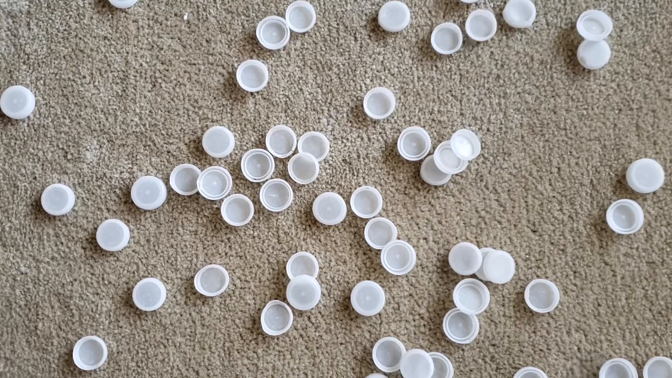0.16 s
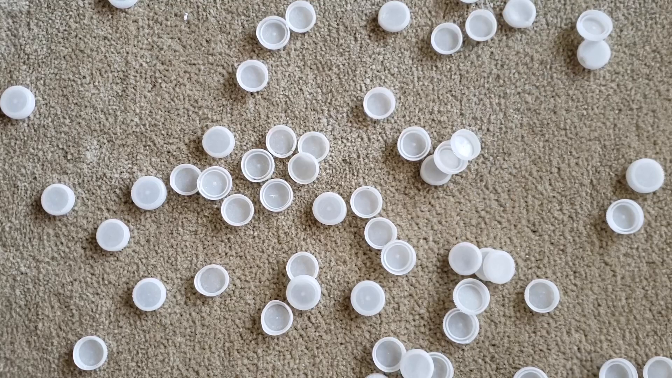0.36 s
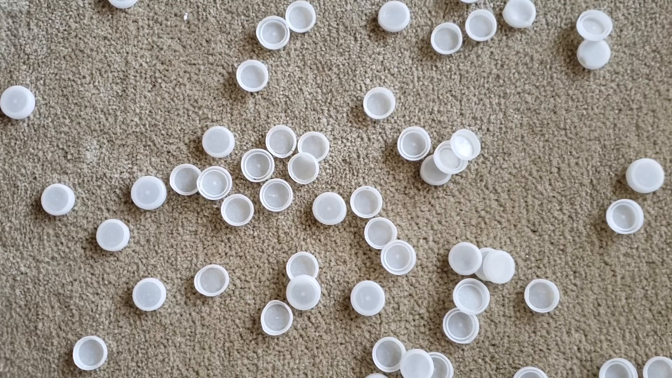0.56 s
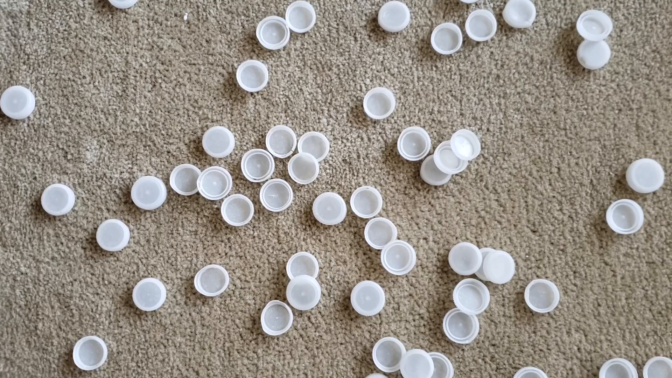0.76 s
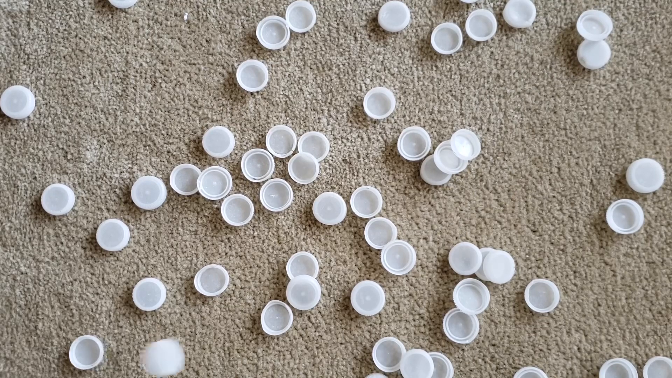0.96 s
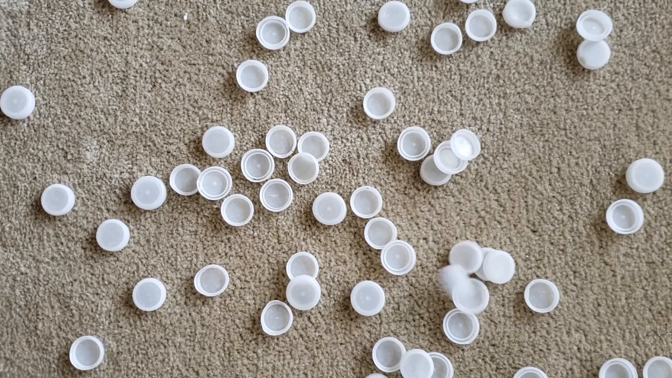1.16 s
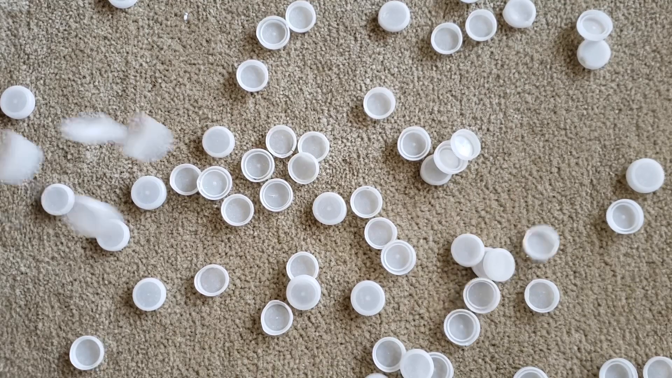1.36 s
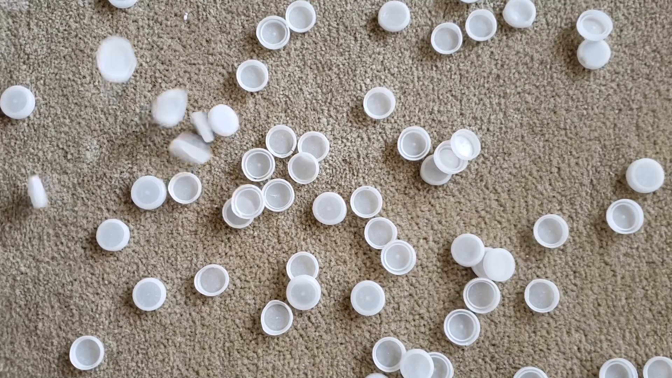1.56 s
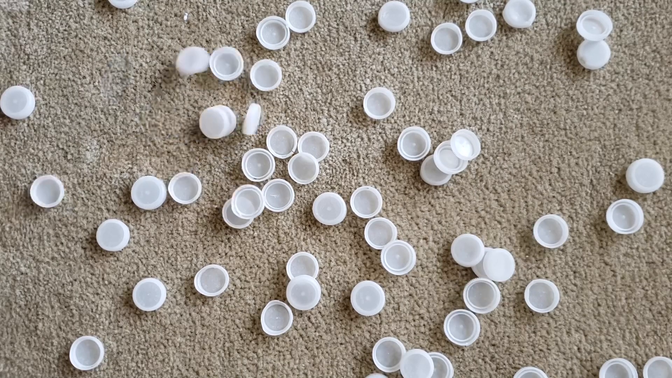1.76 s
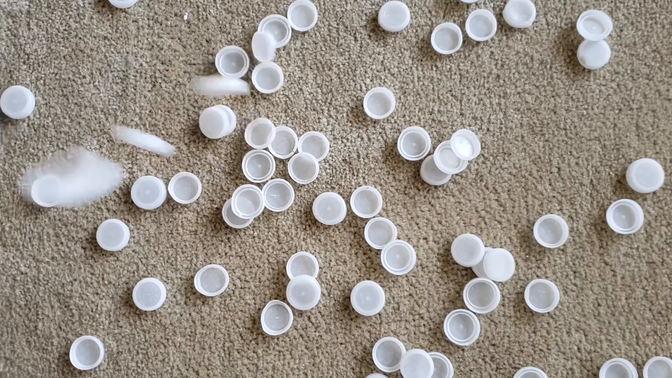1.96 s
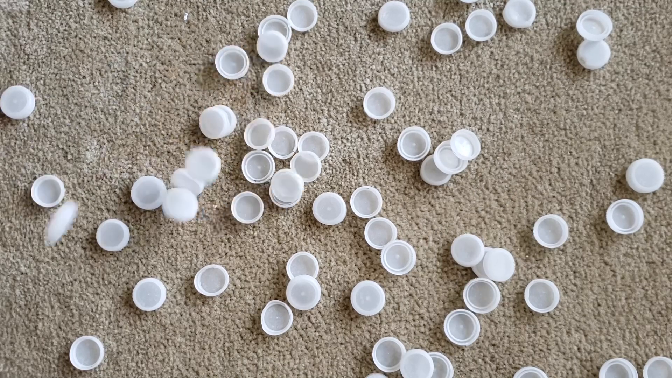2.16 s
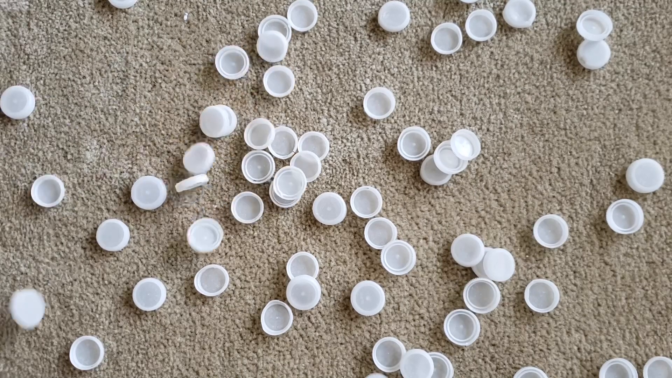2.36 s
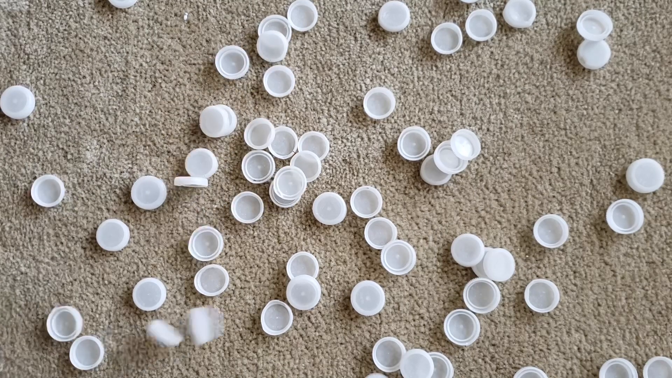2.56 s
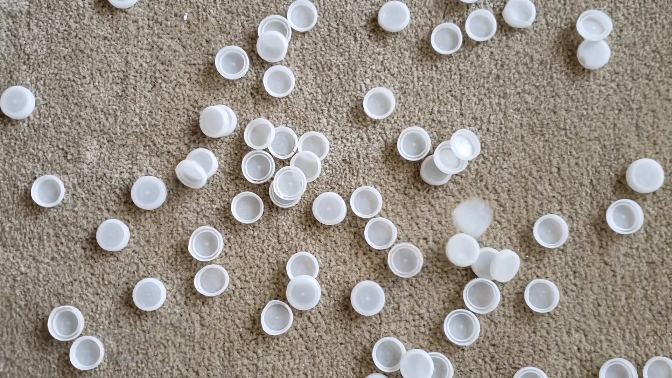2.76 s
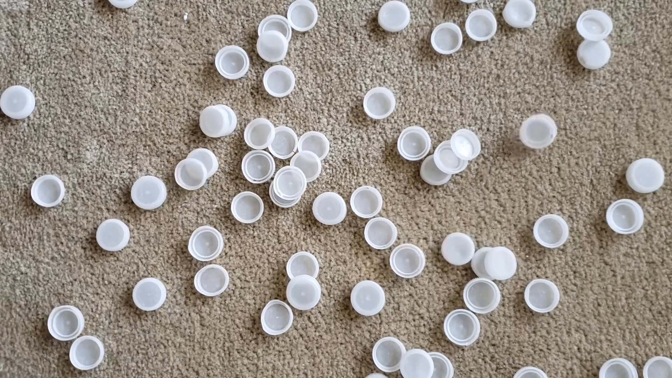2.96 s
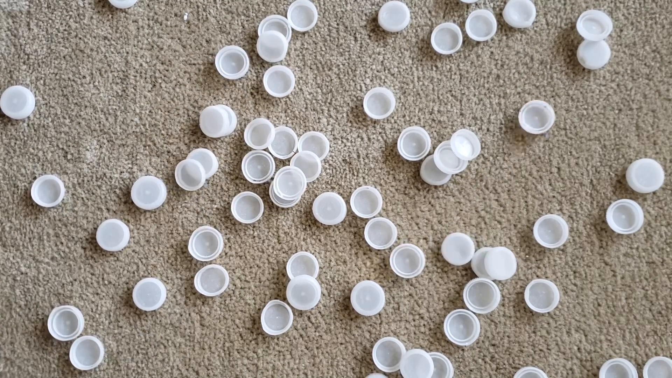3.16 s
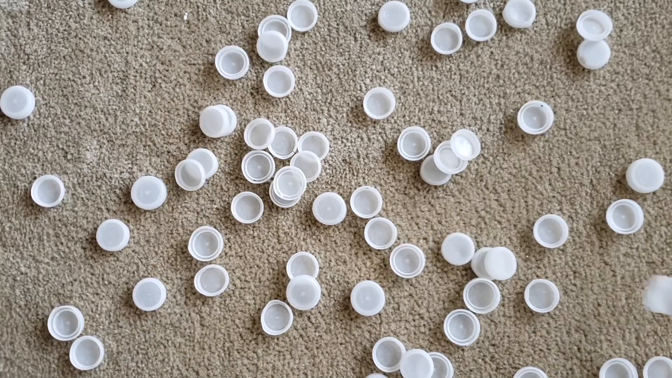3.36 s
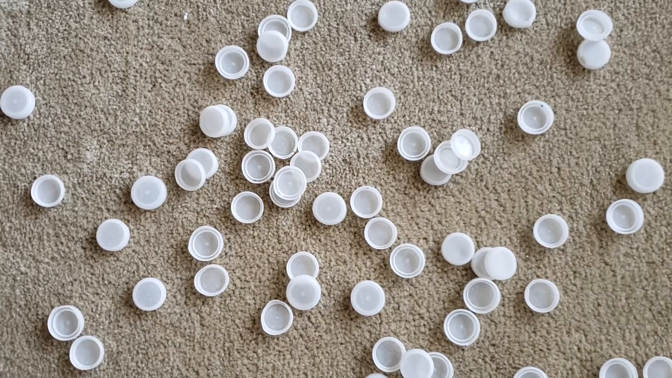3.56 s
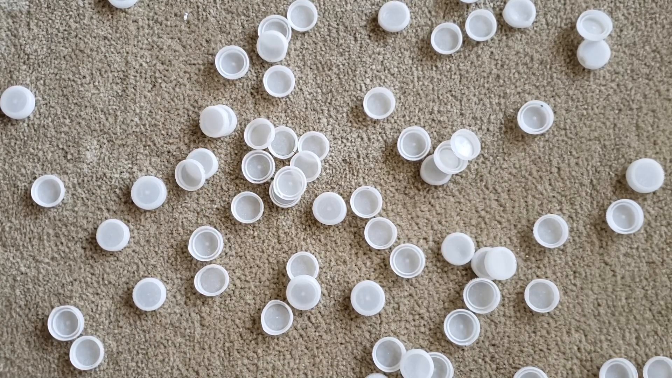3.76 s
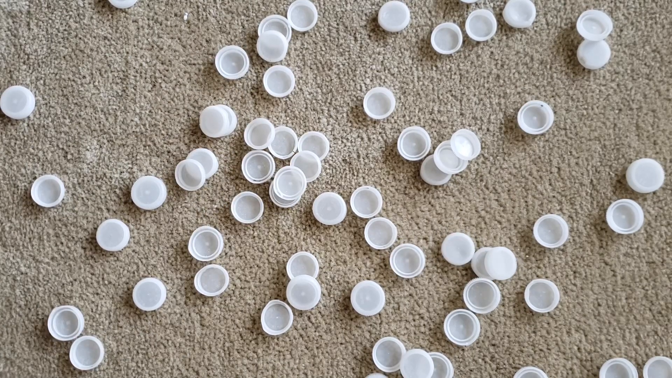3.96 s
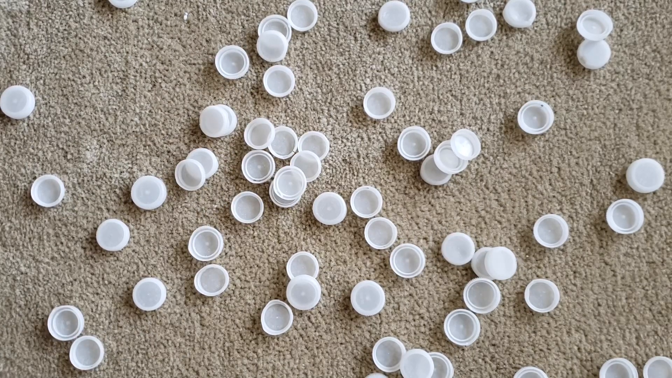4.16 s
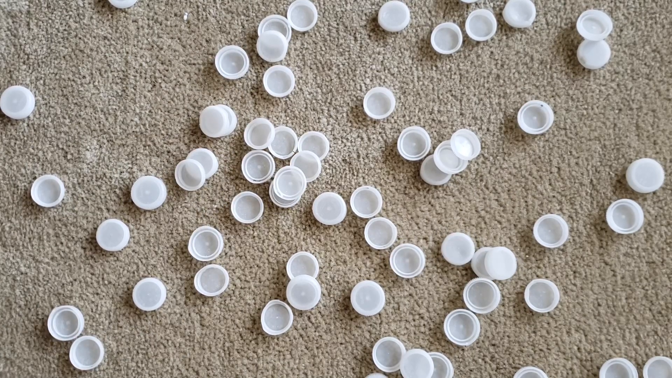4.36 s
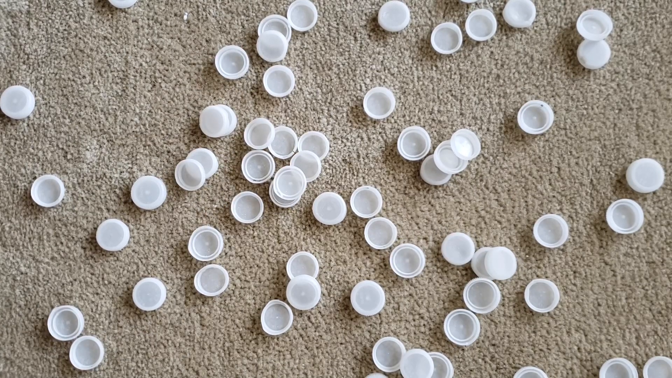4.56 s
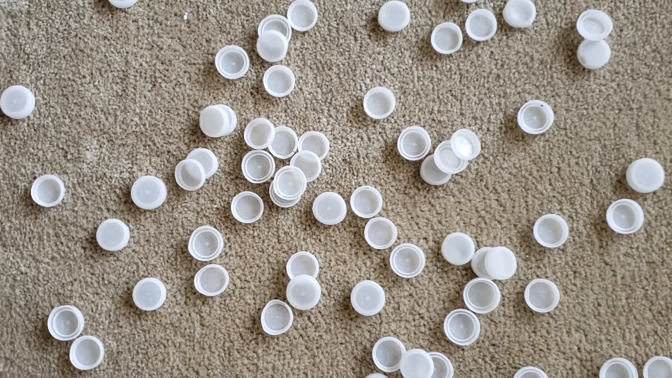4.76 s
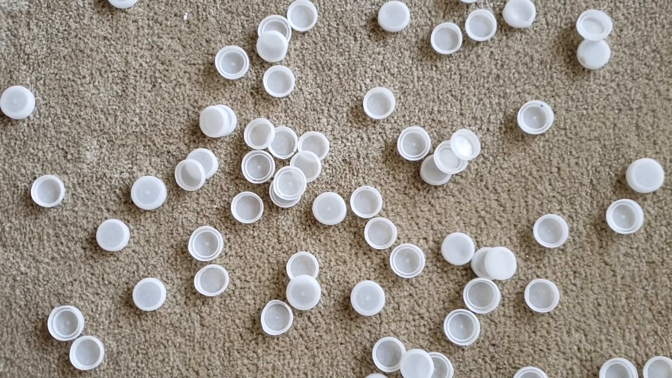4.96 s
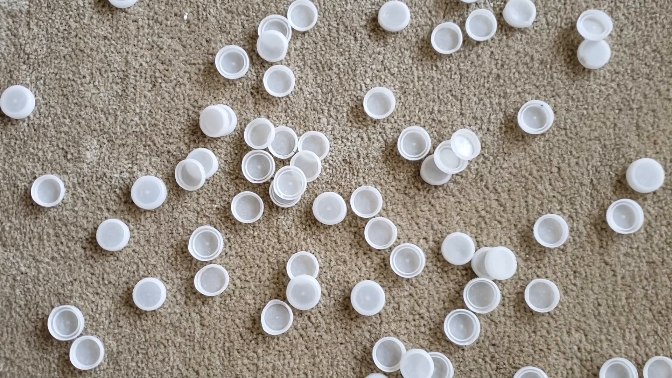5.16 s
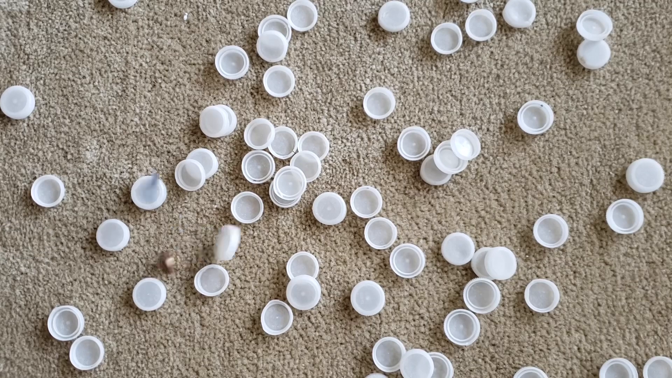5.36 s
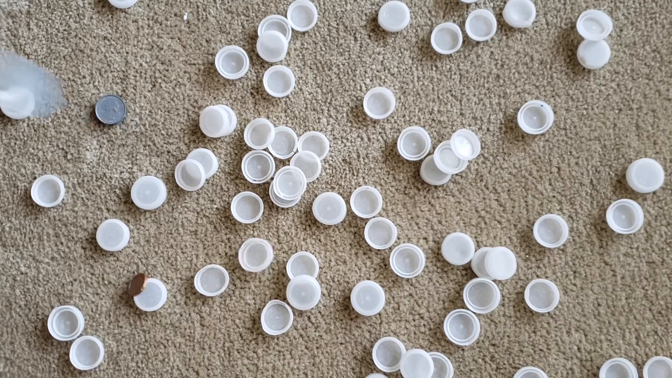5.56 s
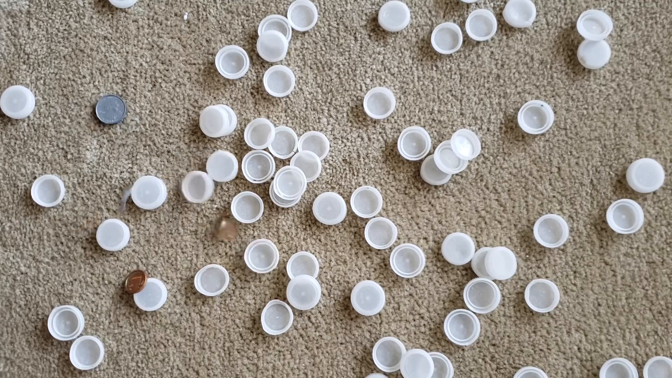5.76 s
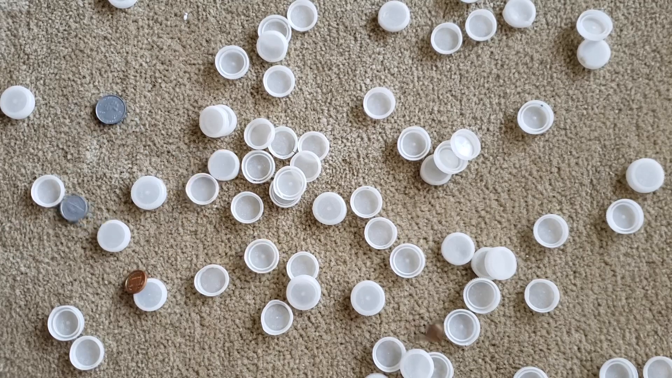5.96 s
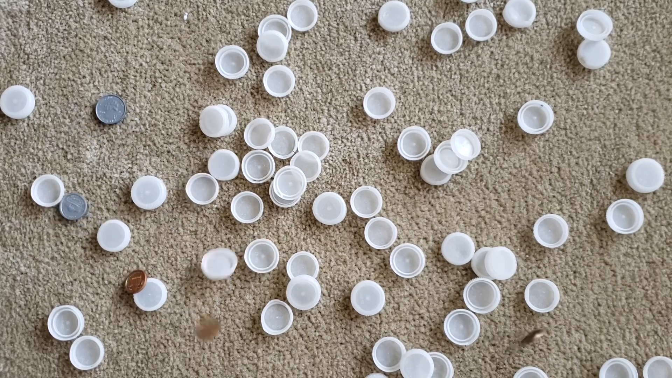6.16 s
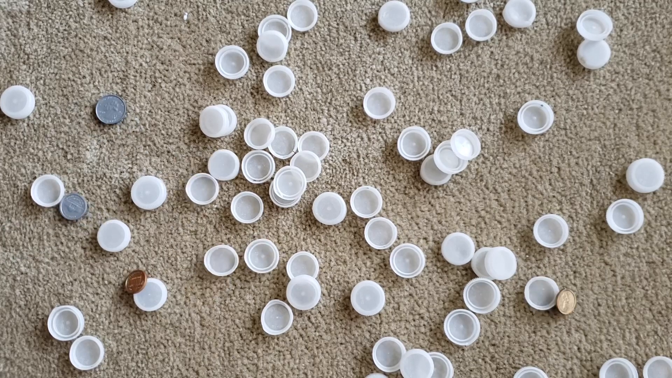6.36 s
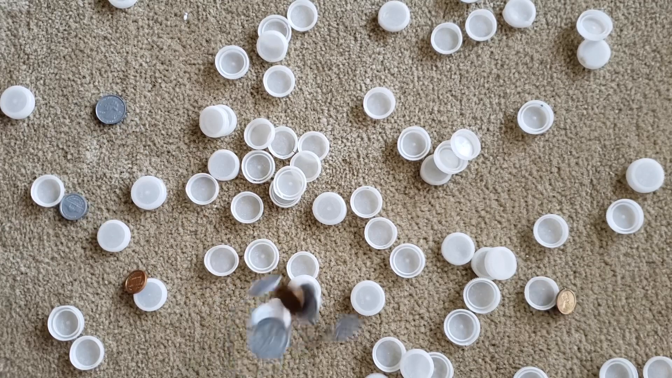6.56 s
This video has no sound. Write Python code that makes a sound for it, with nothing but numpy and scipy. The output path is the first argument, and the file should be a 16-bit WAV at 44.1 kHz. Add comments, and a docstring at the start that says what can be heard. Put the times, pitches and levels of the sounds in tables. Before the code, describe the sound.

Plastic bottle caps clatter in bright hollow clicks onto others on carpet, a distant engine swells faintly, then coins jingle and clink onto the caps.

```python
"""A small live room with a carpet, heard at two microphones over rumble, hum (one sine) and hiss (shaped noise).
From the start until 2.9 s plastic bottle caps are tossed onto caps on the carpet: damped modes and contact
noise, with soft thuds and ticks; a hand's noisy brush comes before the last toss. Around 4 s a distant
engine, a stack of sines, swells for a second. From 4.9 s coins are shuffled in a palm as a spray of ticks,
clink as they leave the hand and land on the caps, each coin ringing in one mode."""
import sys
import numpy as np
from scipy import signal
from scipy.fft import rfft, irfft, next_fast_len
from scipy.io import wavfile

SR = 44100
rng = np.random.default_rng(int(sys.argv[2]) if len(sys.argv) > 2 else 0)


def waveform_to_disk(signal):
    """Save audio, clipped to [-1, 1], as 16-bit WAV at the path in sys.argv[1]."""
    frames = np.transpose(np.atleast_2d(signal))
    scaled = np.clip(frames, -1, 1) * 32767
    samples = np.round(scaled).astype(np.int16)
    wavfile.write(sys.argv[1], SR, samples)


N = 291060

# Throughout these tables f/Hz with a relative level/dB is a spectrum: only its shape counts.
# rumble of the room over time: t/s, level/dB
RUMBLE_LEVEL = [(0, -66), (1.3, -61.5), (2.3, -58.5), (3.1, -63), (4.4, -59), (5.6, -58.5), (6.6, -59)]
# spectrum of the rumble: f/Hz, relative level/dB
RUMBLE_SPECTRUM = [(20, -40), (30, -26.5), (45, 4.5), (62, 4), (110, -1.5), (160, -10), (280, -15.5),
                   (400, -24), (650, -40), (1000, -37), (2200, -86)]
# spectrum of the microphone hiss: f/Hz, relative level/dB
HISS_SPECTRUM = [(240, -21), (450, -10.5), (800, -12.5), (1750, -17.5), (4000, -22), (7900, -35),
                 (10700, -23.5), (15300, -20), (16500, -33)]
# likeness of left and right in the steady noises: f/Hz, correlation (below 0 counts as 0)
STEREO_LIKENESS = [(60, 0.81), (180, 0.81), (550, -1.1), (1650, -1.7), (4970, 0.93), (15000, -1)]
# partials of the engine: multiple of the firing rate, relative level/dB
ENGINE_PARTIALS = [(2, 1), (3, -4), (4, -14), (5, -14), (6, -20.5), (7, -19.5), (8, -23.5), (9.5, -24)]
# the distant engine's swell
ENGINE_S, ENGINE_RISE_S, ENGINE_HOLD_S, ENGINE_FALL_S, ENGINE_DB = 4.03, 0.5, 0.72, 0.6, -51.5
ENGINE_HZ, ENGINE_HZ_PER_S = 29.8, 0.6  # firing rate on reaching full level, and its slow climb
SWELL_DB = 30  # climb of any swell over its rise, and drop over its fall

# spectrum of the hand's brush: f/Hz, relative level/dB
SCUFF_SPECTRUM = [(200, 8.5), (700, -4), (1400, 1.5), (2500, -16), (7000, -26), (10500, -1.5), (15000, -23)]
SCUFF_S, SCUFF_RISE_S, SCUFF_HOLD_S, SCUFF_FALL_S, SCUFF_DB = 2.58, 0.12, 0.058, 0.089, -66

# the pitch at which each size of coin rings
SMALL_HZ, MEDIUM_HZ, WIDE_HZ, LARGE_HZ = 12640, 8130, 7300, 5350
# shuffles of coins in the palm: t/s at full strength, rise/s, hold/s, level/dB of the ticks
PALM_SHUFFLES = [(4.903, 0.055, 0.018, -76), (5.202, 0.17, .07, -63), (5.603, 0.037, 0.01, -48.5),
                 (6.094, 0.082, 0.033, -49.5), (6.239, 0.31, 0.024, -50.5)]
SHUFFLE_RELEASE_S = 0.037  # the shuffle stops as the coins leave
# spectrum of coin sliding on or touching coin: f/Hz, relative level/dB
COIN_CONTACT_SPECTRUM = [(880, -46), (1500, -20), (2040, -39.5), (2540, -17.5), (3310, -14), (6120, -8),
                         (6830, -18.5), (8400, -2.5), (11100, 1), (16000, -13)]
# ring over ticks; medium coin against small; decay time, damped by the hand
JINGLE_DB, JINGLE_MEDIUM_DB, JINGLE_T60 = -8, -9, 0.011
# coin on coin leaving the hand: t/s, ring level/dB, coin pitch f/Hz
COIN_CLINKS = [(4.901, -66, SMALL_HZ), (5.122, -63.5, SMALL_HZ), (5.186, -52.5, SMALL_HZ),
               (5.2423, -44.5, SMALL_HZ), (5.2603, -41, MEDIUM_HZ), (5.6013, -40.5, MEDIUM_HZ),
               (5.6353, -35, SMALL_HZ), (6.0854, -40, MEDIUM_HZ), (6.1112, -46, SMALL_HZ),
               (6.1497, -35.5, SMALL_HZ), (6.4616, -37, SMALL_HZ), (6.4923, -52, MEDIUM_HZ)]
CLINK_TICK_DB, HAND_PAN_DB = -5.5, -3.5  # contact tick over the ring; the hand's place, left over right

# spans of soft cap ticks, in the hand or after a toss: start t/s, end t/s, typical body level/dB,
# typical cap pitch f/Hz
CAP_NUDGES = [(0.599, 0.67, -73, 3400), (0.847, 1.08, -62, 3750), (1.19, 1.4, -46.5, 3300),
              (1.571, 1.69, -52, 3200), (1.738, 1.8, -53.5, 3480), (1.879, 1.96, -53, 3300),
              (2.798, 2.843, -58, 3700)]
# contacts a second; their scatter (its sign is immaterial); snap over body
NUDGE_PER_S, NUDGE_SPREAD_DB, NUDGE_SNAP_DB = 40, -1, -13
CAP_SPREAD = 0.095  # relative scatter of the nudging caps' pitch
CAP_ROOM_DB, CAP_PAN_DB = -2.5, -2  # room setting of a cap; mean place of the small contacts, left over right

# a coin lands on a cap, or its strong near reflection (6.5333): t/s, nominal body level/dB,
# cap pitch f/Hz, nominal snap level/dB, left over right/dB, coin pitch f/Hz, ring level/dB
COIN_LANDINGS = [(5.2922, -31, 3395, -22.5, -29, SMALL_HZ, -42),
                 (5.2984, -30.5, 3290, -25.5, 15, WIDE_HZ, -27.5),
                 (5.3103, -26, 3340, -22, -4.5, SMALL_HZ, -21.5),
                 (5.3224, -28.5, 3376, -42, -25, SMALL_HZ, -30),
                 (5.4226, -41, 3040, -41.5, -10, SMALL_HZ, -40),
                 (5.6506, -23.5, 4052, -28, -8, MEDIUM_HZ, -37), (5.721, -56, 4150, -65, 2, SMALL_HZ, -48),
                 (5.8063, -42.5, 3385, -46, -13, MEDIUM_HZ, -43),
                 (5.817, -42.5, 3370, -39.5, -5, MEDIUM_HZ, -39),
                 (5.9738, -55.5, 3530, -47.5, -13, SMALL_HZ, -53),
                 (6.126, -45, 4000, -32.5, -2, SMALL_HZ, -47), (6.2358, -40, 4320, -37, -8, MEDIUM_HZ, -47),
                 (6.2523, -43.5, 4160, -48, -17, MEDIUM_HZ, -44),
                 (6.3577, -29.5, 3280, -27.5, -44, SMALL_HZ, -28.5),
                 (6.3636, -39, 3230, -35.5, 40, SMALL_HZ, -32.5),
                 (6.531, -20, 4630, -33.5, -17, LARGE_HZ, -20),
                 (6.5333, -27.5, 3860, -35, 0, LARGE_HZ, -29),
                 (6.5719, -30, 3310, -30, -7, LARGE_HZ, -23.5),
                 (6.5778, -24.5, 3390, -43, -2, SMALL_HZ, -50)]
COIN_ROOM_DB, COIN_T60 = 0.5, 0.026  # room setting of a coin; how long a coin rings (s)

# clear blows of cap on cap: t/s, nominal body level/dB, cap pitch f/Hz, nominal snap level/dB,
# left over right/dB
CAP_BLOWS = [(-0.03, -40.5, 4550, -45.5, -4), (0.852, -50.5, 3630, -65.5, -7),
             (0.938, -57.5, 3750, -67, -23), (1.048, -57.5, 3870, -71, -17), (1.1675, -30, 3590, -36, -28),
             (1.1715, -36.5, 3420, -48, 0), (1.1899, -42.5, 3620, -42, -4), (1.2898, -39, 3655, -50, -15.5),
             (1.3548, -35, 3370, -48.5, -8), (1.371, -43.5, 3120, -52, 3.5),
             (1.4207, -19.5, 3390, -27, -11.5), (1.4239, -22, 4117, -25.5, -7.5),
             (1.5231, -45.5, 3210, -49, -5), (1.5387, -48, 3170, -51.5, -8), (1.6291, -40, 3504, -56.5, -4),
             (1.6598, -39.5, 3066, -51, -4), (1.673, -42.5, 3380, -50.5, -5),
             (1.863, -38.5, 3520, -46, -7.5), (1.9176, -38.5, 3360, -57, -13.5),
             (2.009, -39, 3140, -49.5, -10), (2.021, -26, 3080, -24, -10.5),
             (2.068, -32.5, 3320, -43, -10.5), (2.077, -34.5, 4160, -43.5, -6),
             (2.1123, -25.5, 4790, -30.5, -13.5), (2.1148, -21.5, 5640, -35, -5.5),
             (2.258, -36, 4204, -38.5, -4.5), (2.702, -37.5, 3570, -40, -6), (2.7226, -31, 3794, -31.5, -8),
             (2.8097, -50, 4110, -54, -14)]
# soft landings in the pile: t/s, level/dB before the envelope
PILE_THUDS = [(0.0, -50.5), (0.195, -57), (0.932, -58.5), (1.424, -52), (2.012, -52), (2.112, -48.5),
              (2.258, -69), (6.14, -62.5)]
# spectrum of the dull push into the carpet: f/Hz, relative level/dB
CARPET_SPECTRUM = [(25, -40.5), (50, -12), (80, -6), (150, 2.5), (300, -12.5), (700, -20), (2000, -42.5),
                   (6000, -79)]
# modes of a cap's skirt, main one first: multiple of the pitch, relative level/dB, t60/s
# (multiples and levels are typical; a pure blow raises and lengthens the main mode)
SKIRT_MODES = [(1, -0.5, 0.013), (0.76, -21.5, 0.067), (0.91, -12.5, 0.032), (1.12, -8, 0.028),
               (1.74, -19.5, 0.061)]
# modes of a cap's stiff top: typical f/Hz, relative level/dB, t60/s
TOP_MODES = [(10650, 1, 0.056), (10700, 0, 0.012), (11900, -10.5, 0.033)]
# spectrum of the skirt's contact noise: multiple of the cap's pitch, relative level/dB
SKIRT_KNOCK = [(0.15, -42.5), (0.399, -19), (0.7, -2), (1.1, -2), (1.6, -5.5), (2, -15), (3.2, -47.5)]
# spectrum of the top's contact noise: f/Hz, relative level/dB
TOP_SNAP = [(3500, -42), (6300, -8), (7800, -14), (10000, 0), (12500, -3), (15500, -4), (17000, -9.5)]
# spectrum of the hollow tock of the air under a cap: f/Hz, relative level/dB
HOLLOW_TOCK = [(150, -31.5), (450, -18.5), (750, -8.5), (1150, -1.5), (1800, 1), (3500, -25)]

BODY_T60, TREBLE_T60 = 0.43, 0.31  # the room's decay (s) for the caps' body and for the treble
TOP_HZ = 16100  # middle of the recorder's upper band edge


def amp(db):
    """Decibels to gain."""
    return 10 ** (np.asarray(db) / 20)


def unit(x):
    """Scaled to rms 1."""
    return x / np.sqrt(np.mean(x ** 2) + 1e-20)


def attack_unit(x, size=280):
    """Scaled to rms 1 over its first six milliseconds."""
    return x / np.sqrt(np.mean(x[..., :size] ** 2) + 1e-20)


def along(points, hz):
    """(Hz, value) points read on a log frequency axis."""
    f, v = np.transpose(points)
    return np.interp(np.log(hz + 1), np.log(f + 1), v)


def curve(rows):
    """(s, value) rows, one value per sample."""
    return np.interp(np.arange(N) / SR, *np.transpose(rows))


def coloured(x, spectrum):
    """x through a (Hz, dB) spectrum, without phase shift."""
    n = x.shape[-1]
    m = next_fast_len(n)
    gain = amp(along(spectrum, np.fft.rfftfreq(m, 1 / SR)))
    return irfft(rfft(x, m) * gain, m)[..., :n]


def fade(t60, size):
    """An exponential decay by 60 dB in t60 seconds."""
    return np.exp(-np.log(1000) * np.arange(size) / SR / t60)


def swell(s, rise, hold, fall):
    """A gain that climbs by SWELL_DB over the rise, holds from time s, and drops as far over the fall."""
    t = np.arange(N) / SR - s
    distance = np.maximum(-t / rise, (t - hold) / fall)
    return amp(-SWELL_DB * np.clip(distance, 0, 10))


def add(track, s, sound):
    """Mix a sound into the track at time s, cut at the track's ends."""
    start = round(s * SR)
    part = sound[:, max(-start, 0):max(N - start, 0)]
    track[:, max(start, 0):][:, :part.shape[1]] += part


def ring(modes, size=4096):
    """Damped modes, excited a little differently by every blow."""
    t = np.arange(size) / SR
    ringing = np.zeros(size)
    for hz, db, t60 in modes:
        strength = amp(db + 1.0 * rng.normal())
        ringing += strength * fade(t60, size) * np.sin(2 * np.pi * hz * t)
    return attack_unit(ringing * (1 - fade(0.0015, size)))  # soft onset


def crack(spectrum, t60, size=4096):
    """A contact: one sharp impulse and a short noisy chatter."""
    chatter = rng.standard_normal(size) * fade(t60, size)
    impulse = np.arange(size) == 0
    force = chatter / np.linalg.norm(chatter) + 0.7 * impulse
    # start 12 samples late: the colouring also spreads backwards in time
    return attack_unit(coloured(np.roll(force, 12), spectrum))


def room(t60, size=20000):
    """A stereo tail of mean energy 1 a side: single reflections at first, then a dense wash."""
    density = np.clip(0.03 + (np.arange(size) / SR / 0.1) ** 2, 0, 1)
    present = rng.random((2, size)) < density
    arrivals = present * rng.choice([-1, 1], (2, size)) / np.sqrt(density)
    tail = arrivals * fade(t60, size) * (1 - fade(0.03, size)) ** 2
    return unit(tail) / np.sqrt(size)


def placed(sound, pan_db, room_db, t60, echo_db):
    """A sound at the two microphones: direct path, one near reflection and the room."""
    room_sides = unit(amp(np.array([[-1], [1]]) * 3.4))  # the room answers louder on the right
    paths = room(t60) * amp(room_db) * room_sides
    sides = unit(amp(np.array([pan_db, -pan_db]) / 2))
    lag = rng.integers(3, 6)  # samples by which the right microphone hears it later
    echo = round(rng.uniform(0.0019, 0.0029) * SR)
    for side, delay in enumerate((0, lag)):
        paths[side, delay] += sides[side]
        paths[side, echo + delay] += sides[side] * amp(echo_db)
    return signal.fftconvolve(sound[None], paths, axes=1)


def air(spectrum):
    """Steady stereo noise of rms 1; a mid and side mix sets how alike the two microphones hear it."""
    m = next_fast_len(N)
    likeness = np.clip(along(STEREO_LIKENESS, np.fft.rfftfreq(m, 1 / SR)), 0, 1)
    turn = np.arccos(likeness) / 2
    noise = rfft(rng.standard_normal((2, m)))
    mid, side = irfft(noise * [np.cos(turn), np.sin(turn)], m)[:, :N]
    return unit(coloured(np.array([mid + side, mid - side]), spectrum))


def distant_engine():
    """A far engine: sines at multiples of a slowly climbing firing rate swell and sink."""
    t = np.arange(N) / SR
    turns = np.cumsum(ENGINE_HZ + ENGINE_HZ_PER_S * (t - ENGINE_S)) / SR
    engine = np.zeros(N)
    for k, db in ENGINE_PARTIALS:
        engine += amp(db) * np.sin(2 * np.pi * (k * turns + rng.random()))
    passing = amp(ENGINE_DB) * swell(ENGINE_S, ENGINE_RISE_S, ENGINE_HOLD_S, ENGINE_FALL_S)
    return passing * unit(engine)


def background():
    """Room rumble and microphone hiss as shaped noise, mains hum as one sine, and the distant engine."""
    engine = distant_engine()
    rumble = amp(curve(RUMBLE_LEVEL)) * air(RUMBLE_SPECTRUM)
    hiss = amp(-78.5) * air(HISS_SPECTRUM)
    hum = amp(-68) * np.sin(2 * np.pi * 120 * np.arange(N) / SR)
    return rumble + hiss + hum + engine


def scuff():
    """A hand brushes softly past before the last toss of caps: a short swell of shaped noise."""
    brush = swell(SCUFF_S, SCUFF_RISE_S, SCUFF_HOLD_S, SCUFF_FALL_S)
    return amp(SCUFF_DB) * brush * air(SCUFF_SPECTRUM)


def palm():
    """Coins slide over each other in the hand: tiny ticks of very uneven size set them ringing."""
    present = rng.random(N) < 260 / SR  # 260 ticks a second on average
    ticks = present * rng.standard_normal(N) * amp(4 * rng.standard_normal(N))
    effort = np.zeros(N)
    for s, rise, hold, db in PALM_SHUFFLES:
        effort += amp(db) * swell(s, rise, hold, SHUFFLE_RELEASE_S)
    held_coins = ring([(SMALL_HZ, 0, JINGLE_T60), (MEDIUM_HZ, JINGLE_MEDIUM_DB, JINGLE_T60)])
    jingle = signal.fftconvolve(ticks, held_coins)[:N]
    slide = effort * (unit(coloured(ticks, COIN_CONTACT_SPECTRUM)) + amp(JINGLE_DB) * unit(jingle))
    return placed(slide, HAND_PAN_DB, room_db=1.5, t60=TREBLE_T60, echo_db=1)[:, :N]


def clinks():
    """Coin on coin: a bright tick and one ringing mode."""
    track = np.zeros((2, N))
    for s, db, hz in COIN_CLINKS:
        ringing = ring([(hz, 0, COIN_T60)])
        tick = crack(COIN_CONTACT_SPECTRUM, t60=0.0038)
        clink = amp(db) * (ringing + amp(CLINK_TICK_DB) * tick)
        add(track, s, placed(clink, HAND_PAN_DB, room_db=-7, t60=TREBLE_T60, echo_db=-10.5))
    return track


def cap_body(hz, pure_db, hollow_db):
    """The skirt rings at its pitch with a noisy knock, and the air under the cap tocks."""
    (_, main_db, main_t60), *others = SKIRT_MODES
    modes = [(hz, main_db + pure_db, main_t60 * amp(pure_db))]
    for k, db, t60 in others:
        modes.append((k * hz * (1 + 0.036 * rng.normal()), db, t60))
    # high-pitched blows are rim on rim: they clack more than they ring
    rim_db = np.clip((hz - 4000) / 30, 0, 14)
    knock = amp(-8 + rim_db - pure_db) * crack([(k * hz, db) for k, db in SKIRT_KNOCK], t60=0.006)
    skirt = ring(modes)
    tock = amp(hollow_db) * crack(HOLLOW_TOCK, t60=0.033)
    return attack_unit(skirt + knock + tock)


def cap_snap(dull_db):
    """The stiff top snaps: a contact tick over its high modes, which vary with the size of the top."""
    top_size = 1 + 0.041 * rng.normal()
    tick = crack([(f, db - dull_db * (f > 13000)) for f, db in TOP_SNAP], t60=0.005)
    top = ring([(f * top_size, db, t60) for f, db, t60 in TOP_MODES])
    return attack_unit(amp(-9.5) * top + tick)


def add_cap(track, s, body_db, hz, snap_db, pan_db, room_db, pure_db, hollow_db, dull_db):
    """A struck cap, body and snap: a pure blow favours and prolongs the main mode, a dull one loses treble."""
    body = amp(body_db - 0.45) * cap_body(hz, pure_db, hollow_db)
    snap = amp(snap_db - 3.5) * cap_snap(dull_db)
    add(track, s, placed(body, pan_db, room_db - 5.5, BODY_T60, echo_db=-5.5))
    add(track, s, placed(snap, pan_db, room_db - 5.0, TREBLE_T60, echo_db=-4.0))


def nudges():
    """Caps nudge each other, in the hand or after a toss: soft, dull ticks at shifting pitches."""
    track = np.zeros((2, N))
    for start, end, db, typical_hz in CAP_NUDGES:
        for slot in np.arange(start, end, 1 / NUDGE_PER_S):
            s = slot + rng.random() / NUDGE_PER_S
            body_db = db + NUDGE_SPREAD_DB * rng.normal()
            hz = typical_hz * (1 + CAP_SPREAD * rng.normal())
            pan_db = CAP_PAN_DB + 4 * rng.normal()
            add_cap(track, s, body_db, hz, body_db + NUDGE_SNAP_DB, pan_db,
                    room_db=1.5, pure_db=3.0, hollow_db=-28, dull_db=10)
    return track


def coins():
    """A coin's hard edge rings a cap cleanly; the coin sounds one mode; a strong reflection is a row of its own."""
    track = np.zeros((2, N))
    for s, body_db, cap_hz, snap_db, pan_db, coin_hz, ring_db in COIN_LANDINGS:
        add_cap(track, s, body_db, cap_hz, snap_db, pan_db, COIN_ROOM_DB,
                pure_db=4.5, hollow_db=-24, dull_db=2)
        # the ring lasts until the pile damps it
        clink = amp(ring_db) * ring([(coin_hz, 0, COIN_T60)])
        add(track, s, placed(clink, pan_db, COIN_ROOM_DB - 7.5, TREBLE_T60, echo_db=-20.0))
    return track


def thuds():
    """The carpet gives only a dull push: low noise with a soft onset, the same at both microphones."""
    track, size = np.zeros((2, N)), 8192
    for s, db in PILE_THUDS:
        push = unit(coloured(rng.standard_normal(size), CARPET_SPECTRUM))
        thud = amp(db) * push * fade(0.31, size) * (1 - fade(0.03, size))
        add(track, s, thud * np.ones((2, 1)))
    return track


def caps():
    """Caps land on caps and rock back once, more softly; blows with a weaker snap are duller."""
    track = np.zeros((2, N))
    for s, body_db, hz, snap_db, pan_db in CAP_BLOWS:
        dull_db = np.clip(-0.3 * (snap_db + 29), 0, 10)
        add_cap(track, s, body_db, hz, snap_db, pan_db, CAP_ROOM_DB,
                pure_db=4.5, hollow_db=-31, dull_db=dull_db)
        later = s + rng.uniform(0.0076, 0.035)
        other_hz = hz * (1 + 0.088 * rng.normal())
        add_cap(track, later, body_db - 13, other_hz, snap_db - 17.5, pan_db,
                room_db=-2, pure_db=6, hollow_db=-19.5, dull_db=dull_db)
    return track


def scene():
    """Caps, then coins, over the room's background."""
    return background() + scuff() + palm() + caps() + thuds() + coins() + clinks() + nudges()


def record(dry):
    """The recorder keeps nothing above its band limit: a 600 Hz wide slope centred on TOP_HZ."""
    m = next_fast_len(N + SR // 2)
    hz = np.fft.rfftfreq(m, 1 / SR)
    band = np.clip((TOP_HZ - hz) / 600 + 0.5, 0, 1)
    return irfft(rfft(dry, m) * band, m)[:, :N]


dry = scene()
out = record(dry)
waveform_to_disk(out)
```